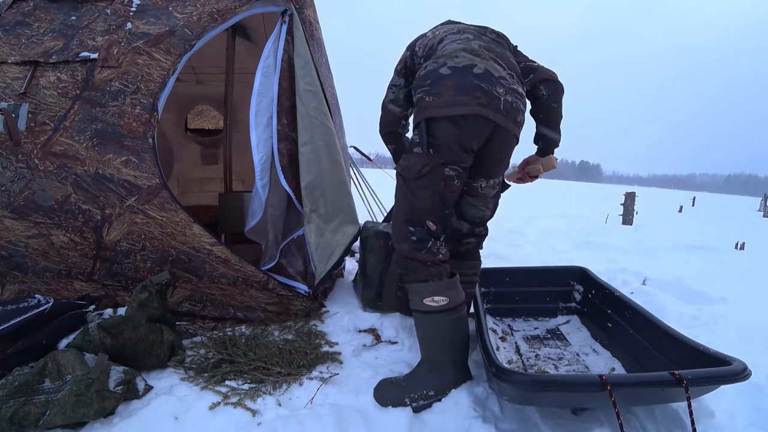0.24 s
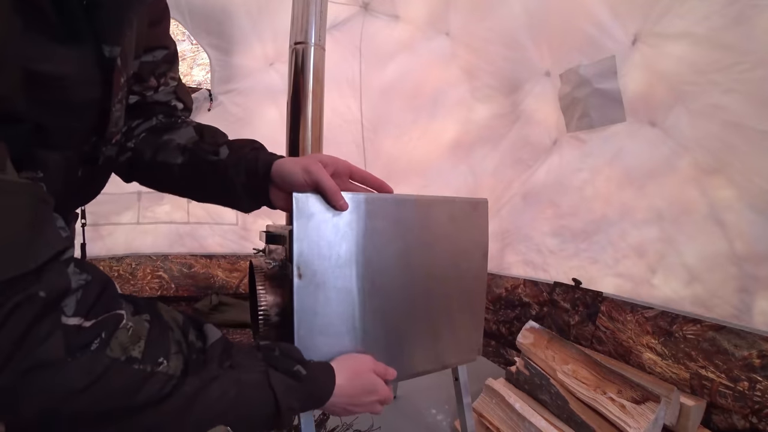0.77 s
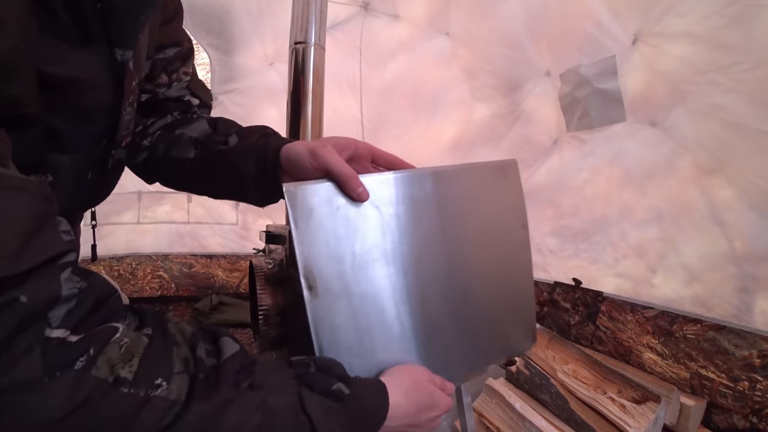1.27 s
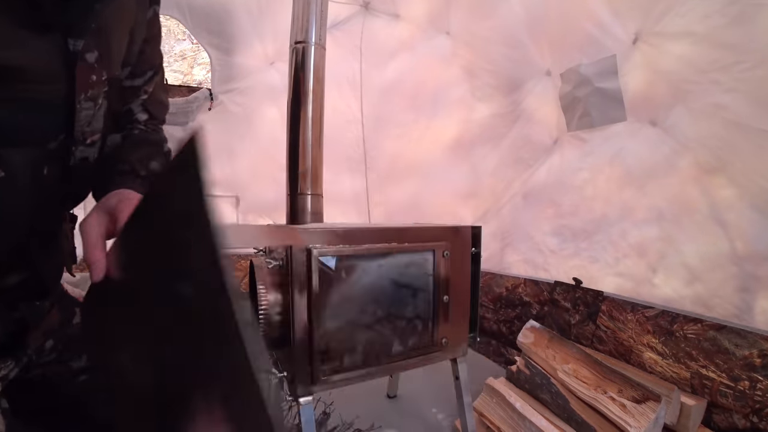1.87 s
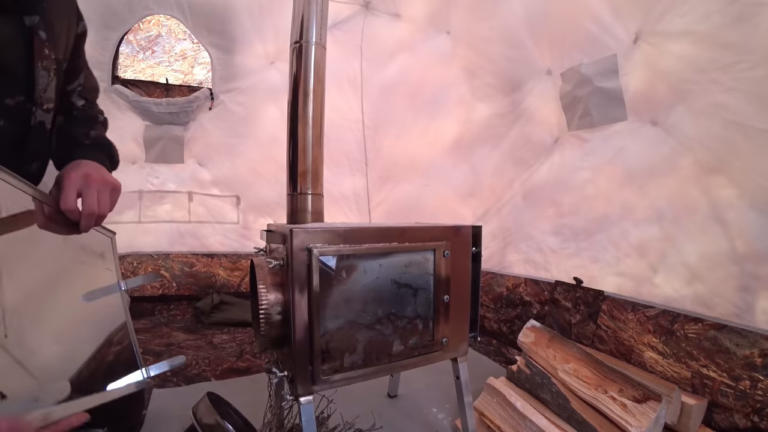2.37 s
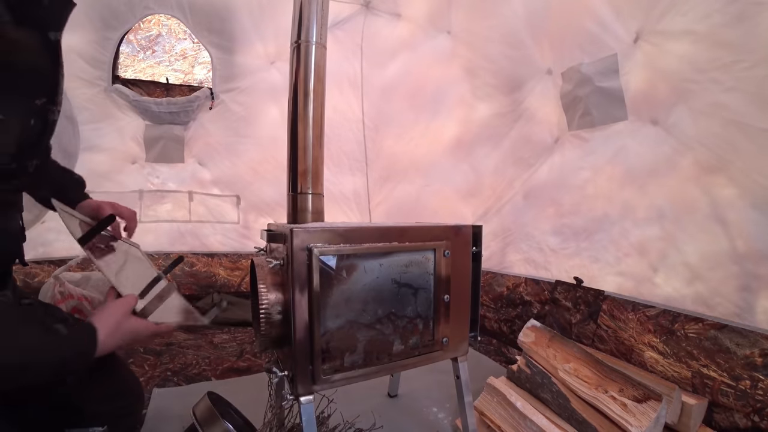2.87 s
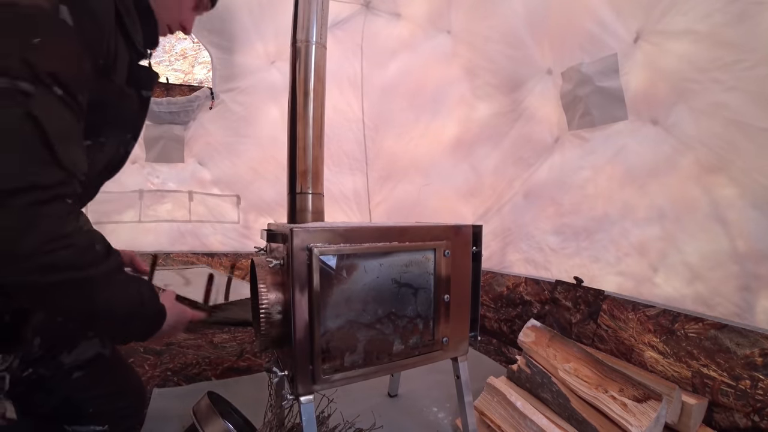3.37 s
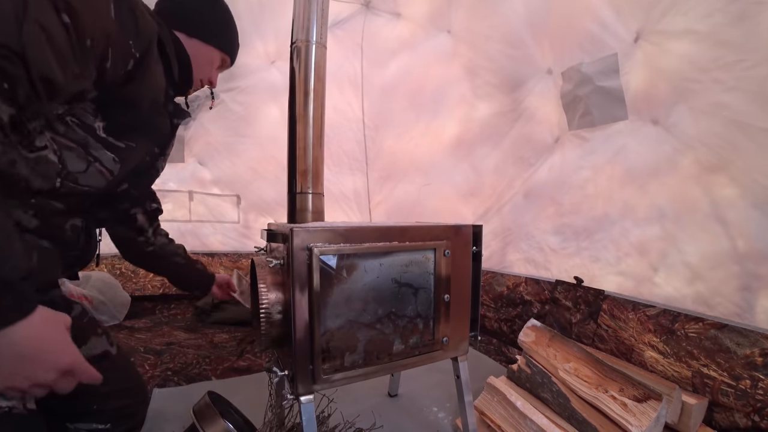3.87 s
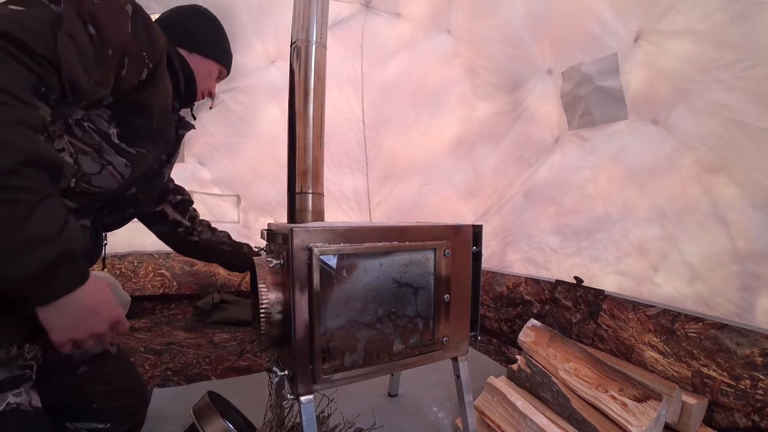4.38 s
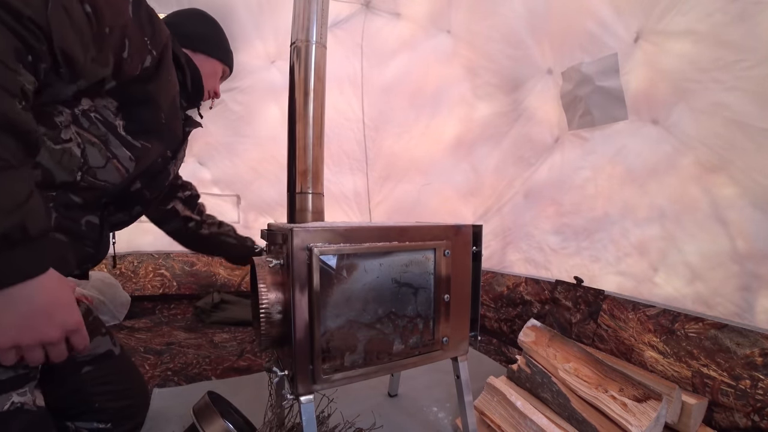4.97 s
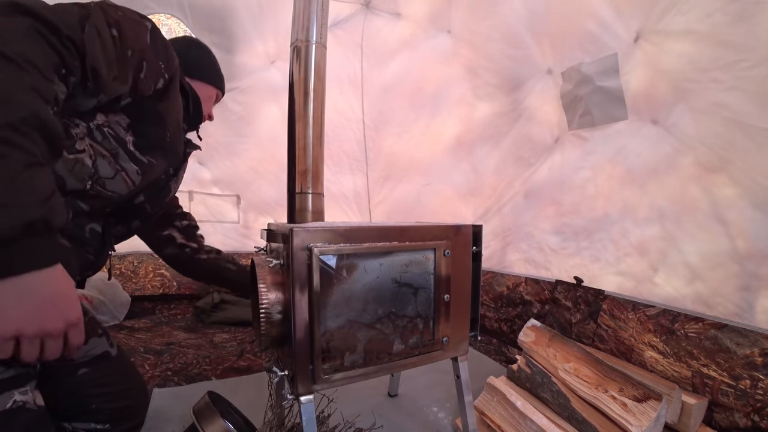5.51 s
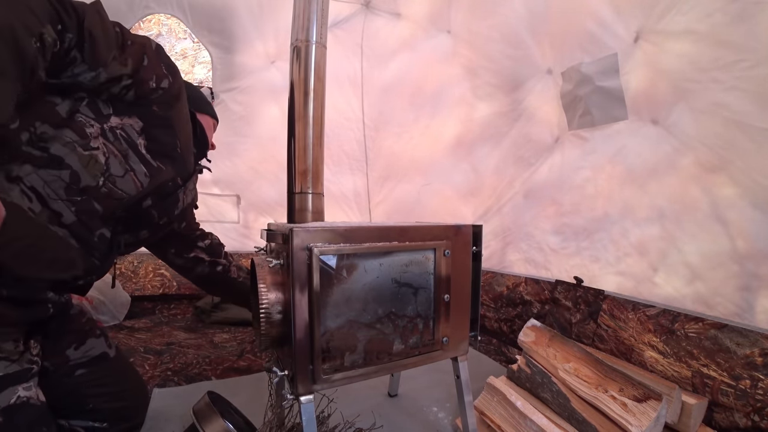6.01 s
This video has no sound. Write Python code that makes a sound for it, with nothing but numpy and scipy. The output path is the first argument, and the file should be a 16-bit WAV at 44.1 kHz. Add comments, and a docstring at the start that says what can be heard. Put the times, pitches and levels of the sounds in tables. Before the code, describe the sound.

From 0 to 0.58 s, outdoors and dry: low wind buffets the microphone, snow crunches, stiff clothes rustle, with a crisp snap near 0.18. A hard cut leads into a quiet tent with faint hush and jacket swishes. Around 0.9 steel scrapes lightly; a bright ringing clank comes at 1.08, a cluster of gritty rubs and short knocks at 1.15-1.24, and the loudest clang at 1.36, with a low sheet wobble fading after. Soft floor thuds accompany it from 0.9 to 1.4. At 2.1-2.3 thin clips scrape and clink quietly; fainter scrapes and muffled steps follow until 3.8. Light latch scratching comes at 4.0, sliding at 4.25, then a short rising hinge groan into a hard door bang at 4.6, with rattle and scrape to 4.75. A latch clacks at 5.16. Quiet cloth, then a dull metallic bump at 6.07 and a tiny one at 6.24.

```python
"""A steel heat shield is scraped and knocked off a small wood stove in a winter tent: clear modes over a crowd of
close ones, set off by cracks or tiny slips, then soft steps as it is carried away. The stove door is slid, shut on
a groaning hinge and latched, then bumped low down; the tent blurs the steel with a short, dense tail.
Behind it, jacket swishes and a faint hush. First comes a dry moment outdoors: wind on the microphone, rustling
clothes and snow, all shaped noise."""
import sys
import numpy as np
from scipy import signal
from scipy.fft import rfft, irfft, next_fast_len
from scipy.io import wavfile
from scipy.ndimage import uniform_filter1d

SR = 44100
rng = np.random.default_rng(int(sys.argv[2]) if len(sys.argv) > 2 else 0)


def to_wav(sig):
    """Store sig (one row per channel, or 1-D mono) as 16-bit WAV at the path in sys.argv[1].

    Samples outside -1..1 are clipped; the rate is SR.
    """
    pcm = np.clip(np.atleast_2d(sig), -1, 1) * 32767
    pcm = np.round(pcm).astype(np.int16)
    wavfile.write(sys.argv[1], SR, pcm.T)  # frames by channels


N = 275625
TIME = np.arange(N) / SR
RING_TIME = TIME[:SR // 2]
FIRM_DB = -30  # level of a firm touch

# shield modes: [f/Hz, t60/s, level/dB touched at hook, at rim, at corner]
SHIELD_MODES = [(622, 0.52, 0.5, -23, -29), (955, 0.15, 2.5, 12, -22), (1068, 0.18, -3, -13, 0),
                (1355, 0.2, 7.5, -12, -44), (1650, 0.11, -15, -26, -1), (1780, 0.19, -27, 4, -25),
                (1815, 0.11, -31.5, -20, 1), (2040, 0.078, -16, 5, 1.5), (2162, 0.33, 3, -5.5, -40),
                (2401, 0.13, 7.5, -4, -25), (2570, 0.094, 5, -14, -18), (2582, 0.16, -21, 7, -5.5),
                (2950, 0.06, -31, 12, -2), (3150, 0.12, -11, -10, -19), (3520, 0.14, 4, -17, -35),
                (3900, 0.088, 3.5, 8.5, -23), (4190, 0.13, 1, -9, -8), (4380, 0.19, -30, 6, -4.5),
                (4721, 0.24, -25, -15, -11), (5150, 0.22, -11, -16, -13), (5675, .22, -3.5, -14, -28),
                (6078, 0.24, -16, -9, -16), (6700, 0.22, -3, -7, -24), (7289, 0.26, -3.5, -13, -28)]
# stove modes: [f/Hz, t60/s, level/dB touched at door, at latch, at foot]
STOVE_MODES = [(289.3, 0.46, -19, -12, 2.5), (402.7, 0.35, 0.5, -6, 3.5), (472, .06, 6, -7, -27),
               (552, 0.049, 8.5, -27.5, -20), (616, 0.059, 11, -27, -12), (882, 0.1, -25, 12, -22),
               (947, 0.16, 1, -4, 7), (1610, 0.12, -1, -11.5, -8), (1883, 0.16, 2, -12, -1),
               (2050, 0.11, 3, 6, -13.5), (2240, 0.23, 1.5, -5, -11), (2520, 0.22, 4.5, -16, -3),
               (3400, 0.25, -2, -4, -12), (3840, 0.14, 1, -24.5, -19), (4830, 0.15, 3, 4, -14),
               (5670, 0.21, -4, 0, -14), (6160, 0.19, -2, 3.5, -20), (7580, 0.18, -0.5, -19, -26)]
# modes of the spring clips on the back of the shield: [f/Hz, t60/s, level/dB touched at root, at tip]
CLIP_MODES = [(968, 0.35, -4, -16), (1402, 0.17, -12, 5.5), (1537, 1.54, -30, -6.5), (2620, 0.15, -7, 4),
              (2870, 0.14, 0, 7), (3080, 0.17, 1.5, -9), (4520, 0.098, 1.5, -11), (4610, 0.18, 3, -16),
              (5500, .15, -9, -16), (8150, 0.087, -7, -3)]
# crowded upper modes of the clips: [f/Hz, level/dB]
CLIP_COLOUR = [(100, -19), (250, 1.5), (480, -16), (950, 0.5), (1180, -8), (1400, -6), (1700, -6.5),
               (2800, -4.5), (3850, -8), (4600, -3), (6500, -10.5), (8200, -18.5), (15500, -31)]
# touched places: modes (table), order (its level column), push_s (build-up time constant/s),
# pan_db (left minus right/dB), colour of the crowded modes [f/Hz, level/dB]
CONTACTS = { "hook": dict(modes=SHIELD_MODES, order=0, push_s=0.00056, pan_db=-.5, colour=[(59, -73),
            (100, -37), (429, -14), (627, -9), (791, -18), (1060, -12), (1230, -8), (1370, -3.5),
            (1840, -7), (2470, -1.5), (2810, -12), (4020, -4.5), (4450, -12), (5300, -8), (7410, -13.5),
            (15500, -23.5)]),
            "edge": dict(modes=SHIELD_MODES, order=1, push_s=0.00069, pan_db=-0.5, colour=[(59, -24),
            (150, -2), (500, -9), (760, -1.5), (1000, -2.5), (1500, -5.5), (2500, -7), (3500, -5.5),
            (6000, -10), (9000, -17.5), (15500, -30)]),
            "rim": dict(modes=SHIELD_MODES, order=1, push_s=0.00056, pan_db=0, colour=[(59, -23.5),
            (100, -17), (275, -11.5), (370, -7), (627, -12), (697, -3.5), (808, -11.5), (936, -1),
            (1290, -12.5), (1690, -8), (1840, -12), (2990, -6), (3610, -9.5), (6000, -11.5),
            (15500, -34.5)]),
            "corner": dict(modes=SHIELD_MODES, order=2, push_s=0.00045, pan_db=-.5, colour=[(60, -12),
            (115, 0), (250, -7), (500, 1), (800, 0.5), (1000, 4), (1270, -7.5), (1750, 2), (2400, -5),
            (4700, 0), (5600, -12), (6100, -2), (7200, -13), (8300, -7), (9700, -21.5), (11300, -7.5),
            (15500, -27)]),
            "clip": dict(modes=CLIP_MODES, order=0, push_s=0.0013, pan_db=3, colour=CLIP_COLOUR),
            "clip tip": dict(modes=CLIP_MODES, order=1, push_s=0.0045, pan_db=4, colour=CLIP_COLOUR),
            "door": dict(modes=STOVE_MODES, order=0, push_s=0.0016, pan_db=0.5, colour=[(80, -29),
            (180, -6), (280, -23), (400, 8), (620, -12.5), (730, -4), (1000, -4), (1750, -2), (2300, -4),
            (3200, -1), (6000, -1.5), (8500, -16.5), (11000, -16.5), (15500, -39)]),
            "latch": dict(modes=STOVE_MODES, order=1, push_s=0.003, pan_db=0.5, colour=[(59, -42),
            (100, -8), (293, -7.5), (370, -4), (403, -3.5), (682, -7.5), (879, -9.5), (977, -9),
            (1180, -6.5), (1800, -5), (2090, -3), (3460, -5), (3930, -3.5), (6530, -9), (15500, -28)]),
            "slider": dict(modes=STOVE_MODES, order=1, pan_db=1, colour=[(100, -11), (400, 0.5),
            (1100, -11.5), (1600, -6), (2100, 1.5), (3800, -0.5), (6300, -1.5), (9000, -13), (15500, -19)]),
            "foot": dict(modes=STOVE_MODES, order=2, push_s=0.0038, pan_db=0.5, colour=[(70, -21.5),
            (140, 8), (190, -9), (270, 13.5), (400, -2.5), (520, -22), (1000, -7), (1200, -7), (1800, -2.5),
            (4500, -6), (7000, -10.5), (9000, -20), (15500, -30)]), }
# answer to a firm touch: crack_db (knock crack/dB), rub_ring_db (clear ring of a rub/dB),
# tilt_db (rub tilt/(dB/octave)), judder_db (rub judder/dB per unit of walk)
RESPONSE = { "hook": dict(crack_db=-18),
            "edge": dict(crack_db=3, rub_ring_db=-24, tilt_db=-0.44, judder_db=0),
            "rim": dict(crack_db=1, rub_ring_db=-15, tilt_db=-0.5, judder_db=2.5),
            "corner": dict(crack_db=-7.5, rub_ring_db=-6, tilt_db=-1, judder_db=2),
            "clip": dict(crack_db=13, rub_ring_db=-7.5, tilt_db=4, judder_db=2),
            "clip tip": dict(crack_db=0),
            "door": dict(crack_db=-8, rub_ring_db=-6, tilt_db=-2, judder_db=2.5),
            "latch": dict(crack_db=3, rub_ring_db=-38, tilt_db=3, judder_db=0.8),
            "slider": dict(rub_ring_db=-28, tilt_db=2.5, judder_db=0), "foot": dict(crack_db=-4), }
# thud of the tent floor: [f/Hz, level/dB]
THUD = [(25, -4), (60, -1.5), (100, 4), (150, 3.5), (230, -3), (300, -5), (420, -4.5), (700, -12.5),
        (1900, -16.5), (4000, -45)]


def undb(db):
    """Decibels to gain."""
    return 10 ** (np.asarray(db) / 20)


def unit(x):
    """Scale to rms 1."""
    return x / np.sqrt(np.mean(x ** 2))


def gain_at(hz, points):
    """Gain of a [f/Hz, level/dB] table, interpolated on log frequency."""
    f, db = np.transpose(points)
    return undb(np.interp(np.log(hz + 1), np.log(f), db))


def shape(x, response):
    """Filter by a gain that is a function of frequency."""
    size = next_fast_len(x.shape[-1])
    gain = response(np.arange(size // 2 + 1) * SR / size)
    return irfft(rfft(x, size) * gain, size)[..., :x.shape[-1]]


def noise(colour, size=N, grain_db=0):
    """Coloured stereo noise with mid rms 1; uneven sample sizes make it gritty."""
    # stereo width: [f/Hz, side minus mid/dB]
    side_db = [(25, -17), (70, -11), (130, -16), (300, -19), (600, -17), (2000, -12), (8000, -6.5),
               (15000, -8)]
    grit = undb(grain_db * np.repeat(rng.standard_normal(size // 32 + 1), 32)[:size])
    mid, side = shape(grit * rng.standard_normal((2, size)), lambda f: gain_at(f, colour))
    side = shape(side, lambda f: gain_at(f, side_db))
    return np.array([mid + side, mid - side]) / np.std(mid)


def walk(rate_per_s, size=N):
    """Random drift between fresh values at the given rate; its spread is about 1.4."""
    hold = int(SR / rate_per_s)
    held = np.repeat(rng.standard_normal(size // hold + 1), hold)
    return 1.72 * uniform_filter1d(held, hold)[:size]


def fade(t60_s):
    """Exponential decay by 60 dB in t60_s."""
    return np.exp(-np.log(1000) * RING_TIME / t60_s)


def held_fade(t60_s, hold_s):
    """Level 1 for hold_s, then exponential decay."""
    return np.minimum(1, fade(t60_s) * np.exp(np.log(1000) * hold_s / t60_s))


def swell(s, rise_s, fall_s):
    """Gaussian-flanked movement that peaks at 1 at time s; the floor of exp(-20) is inaudible."""
    return np.exp(-np.minimum(((TIME - s) / np.where(TIME < s, rise_s, fall_s)) ** 2, 20))


def movements(rows, rest_db):
    """Gain of [t/s, half length/s, level/dB] movements over a resting level; their powers add."""
    power = sum((undb(db) * swell(s, half_s, half_s)) ** 2 for s, half_s, db in rows)
    return np.sqrt(undb(rest_db) ** 2 + power)


def add(out, s, x):
    """Mix a sound in at time s."""
    start = max(int(s * SR), 0)
    out[:, start:start + x.shape[1]] += x[:, :N - start]


def outdoors():
    """Wind buffets the ports; snow and stiff clothes crunch and snap, dry and without echo."""
    # wind and snow spectra: [f/Hz, level/dB]
    wind_colour = [(12, -2.5), (22, 5), (38, 1), (60, -5.5), (130, -13), (400, -40), (800, -67)]
    snow_colour = [(88, -27), (150, -0.5), (243, -3), (306, 0), (386, -3.5), (972, -4), (1640, -7.5),
                   (4720, -12), (11200, -27), (15000, -31.5)]
    # wind gusts: [t/s, half length/s, level/dB]
    gusts = [(.06, 0.022, -41), (.15, 0.048, -36), (.297, 0.023, -39.5), (.442, 0.013, -33.5),
             (.56, .015, -45)]
    # boots shifting weight in snow: [t/s, half length/s, level/dB]
    crunches = [(.07, 0.025, -42.5), (.108, 0.039, -42.5), (.22, 0.076, -47.5), (.516, 0.0089, -40),
                (.558, 0.034, -40.5)]
    # snaps of stiff cloth and snow crust: [t/s, level/dB, centre f/Hz, t60/s]
    snaps = [(0.097, -41, 1500, 0.028), (0.1818, -27.5, 4800, 0.016), (.262, -44, 9000, .025),
             (.350, -41, 10000, 0.018), (0.362, -39, 4900, 0.022), (0.469, -37, 3400, 0.043),
             (0.495, -43, 10500, 0.014), (0.507, -43, 2600, .025), (0.555, -42, 1500, 0.013)]
    wind_db, rustle_db = -44, -47.5  # resting levels; the rustle is stiff clothes
    wind = noise(wind_colour) * movements(gusts, wind_db) * undb(1.4 * walk(17.6))
    snow = noise(snow_colour, grain_db=1.5) * movements(crunches, rustle_db) * undb(1.54 * walk(60.3))
    out = wind + snow
    for s, db, hz, t60_s in snaps:
        colour = [(hz / 4, -25), (hz * 0.64, -10), (hz, 0), (hz * 1.6, -14), (hz * 3, -22)]
        snap = noise(colour, len(RING_TIME)) * fade(t60_s)
        add(out, s, undb(db) * snap * (1 - np.exp(-RING_TIME / 0.00094)))
    return out


def tent():
    """Sleeves brush unevenly with each arm movement, over a faint steady hush."""
    # jacket cloth and tent hush spectra: [f/Hz, level/dB]
    cloth_colour = [(40, -8.5), (110, -6), (250, -8), (700, -11), (1600, -12), (4400, -11), (8000, -19.5),
                    (15500, -31)]
    hush_colour = [(20, -1), (60, -6), (200, -20.5), (600, -16), (1800, -13), (3000, -29), (15500, -28.5)]
    # arm movements: [t/s, half length/s, level/dB]
    swishes = [(.66, 0.12, -51.5), (.84, 0.15, -54.5), (1.87, 0.14, -55.5), (2.13, 0.21, -49),
               (2.66, 0.27, -53), (3.2, 0.33, -57.5), (3.5, 0.23, -56.5), (4.15, 0.58, -57),
               (4.84, 0.1, -54), (5.22, 0.23, -57.5), (6.05, 0.28, -56)]
    jacket_db, hush_db = -61.5, -64.5  # jacket between movements; hush
    cloth = noise(cloth_colour, grain_db=0.5)
    sleeves = cloth * movements(swishes, jacket_db) * undb(0.69 * walk(30))
    return sleeves + noise(hush_colour) * undb(hush_db)


def steps():
    """Soft boots and knees load the floor in dull noise thuds; boots also drag over it."""
    # footfalls and knees: [t/s, level/dB]
    footfalls = [(0.929, -42), (1.002, -37), (1.142, -31), (1.268, -32.5), (1.404, -36), (1.862, -50.5),
                 (2.223, -43.5), (2.297, -44.5), (2.771, -40), (2.805, -45), (3.273, -50), (3.438, -47.5),
                 (3.481, -43), (3.616, -45.5), (3.675, -49.5), (3.795, -51), (4.414, -51.5), (4.965, -57)]
    # dragged boots: [t/s, half length/s, level/dB]
    shuffles = [(0.696, 0.035, -47.5), (0.814, 0.18, -54), (1.602, 0.017, -41), (1.663, 0.043, -45.5)]
    build_s, hold_s, t60_s = 0.0039, 0.0017, 0.16
    drag = sum(undb(db) * swell(s, half_s, half_s) for s, half_s, db in shuffles)
    out = noise(THUD) * drag
    load = np.minimum(RING_TIME / build_s, 1) * held_fade(t60_s, hold_s)
    for s, db in footfalls:
        add(out, s - build_s / 2, undb(db) * noise(THUD, len(RING_TIME)) * load)
    return out


def wobble():
    """Lowest bending mode of the sheet, as narrow-band noise: each flex sets it swaying, it dies slowly."""
    # flexes as the sheet comes free and as it is turned over: [t/s, level/dB]
    flexes = [(1.24, -45), (2.2, -75)]
    centre_hz, half_width_hz = 136, 11.6
    rise_s, t60_s = 0.0193, 2.2
    sway = shape(rng.standard_normal(N), lambda f: 1 / (1 + ((f - centre_hz) / half_width_hz) ** 2))
    power = 0
    for s, db in flexes:
        age_s = np.maximum(TIME - s, 0)
        level = undb(db) * np.minimum(age_s / rise_s, 1) * np.exp(-np.log(1000) * age_s / t60_s)
        power = power + level ** 2
    return unit(sway) * np.sqrt(power)


def hinge():
    """The groan gets higher and louder as the door gathers speed; its pitch and level are unsteady."""
    slow_hz, fast_hz, groan_db = 359, 461, -52  # before the random wander
    speed = swell(4.552, rise_s=0.0686, fall_s=0.063)  # fastest shortly before the door strikes
    hz = (slow_hz + (fast_hz - slow_hz) * speed ** 2) * (1 + 0.047 * walk(200))
    groan = unit(np.sin(2 * np.pi * np.cumsum(hz) / SR))
    return groan * speed * undb(groan_db + 3.1 * walk(100))


def modal_ring(place):
    """Clear modes of the touched part; a weaker detuned twin makes each beat."""
    mode_split = 0.00703  # nominal detuning of the twin as a share of f
    clear, gains = 0, undb(np.array([mode[2 + place["order"]] for mode in place["modes"]]))
    for (hz, mode_t60_s, *_), gain in zip(place["modes"], gains):
        # short waves reach the two ports less alike
        port_scatter = 0.5 * min(hz / 4000, 1) * rng.standard_normal((2, 1))
        phase = rng.uniform(0, 2 * np.pi) + port_scatter
        twin_hz = hz * (1 + mode_split * rng.choice([-1, 1]) * rng.uniform(1 / 2, 2.3))
        angle, twin_angle = (np.float32(2 * np.pi * f * RING_TIME) + np.float32(phase) for f in (hz, twin_hz))
        pair = np.sin(angle) + 0.55 * np.cos(twin_angle)
        clear = clear + gain * fade(mode_t60_s) * pair
    return clear / np.sqrt(np.sum(gains ** 2) / 2)


def crowded_wash(place, t60_s):
    """Crowd of close modes as unevenly bunched noise, decaying by octave and blurred by the tent."""
    ripple_db, ripple_step_hz = 3.5, 54.95  # spread and spacing of the bunches
    tent_fill_s = 0.0054  # early reflections hold the level
    bass_linger = 0.0047  # lows outlast the treble: log2 of t60 per octave down
    crowd, wash = noise(place["colour"], len(RING_TIME), grain_db=0.5), 0
    bunches = unit(undb(ripple_db * rng.standard_normal(600)))
    crowd = shape(crowd, lambda f: np.interp(f, ripple_step_hz * np.arange(len(bunches)), bunches))
    octaves = np.arange(-3, 5)  # relative to 1 kHz
    for octave in octaves:
        band = shape(crowd, lambda f: np.interp(np.log2((f + 1) / 1000), octaves, octaves == octave))
        wash = wash + band * held_fade(t60_s * 2 ** (-bass_linger * octave), tent_fill_s)
    return wash


def ring(contact, ring_db, t60_s):
    """Steel touched once: clear modes over a wash of crowded ones, panned to its place."""
    place = CONTACTS[contact]
    steel = crowded_wash(place, t60_s) + undb(ring_db) * modal_ring(place)
    pan = undb(place["pan_db"] / 2 * np.array([[1], [-1]]))
    return steel * (1 - np.exp(-RING_TIME / 0.00045)) * pan


def scrapes():
    """Tiny slips keep steel ringing; grip judders, the spot wanders between two, firmer rubs are brighter."""
    # rubs of metal on metal: [t of strongest pressure/s, contact, rise/s, fall/s, level/dB]
    rubs = [(.929, "edge", 0.027, 0.044, -32), (1.005, "edge", 0.032, 0.062, -37.5),
            (1.148, "rim", 0.018, 0.051, -26.5), (1.183, "rim", 0.017, 0.038, -25),
            (1.349, "corner", 0.02, 0.013, -30.5), (2.23, "clip", 0.055, 0.066, -39),
            (2.52, "clip", 0.0152, 0.041, -48.5), (2.69, "clip", 0.026, 0.018, -47),
            (2.765, "clip", 0.026, 0.033, -48.5), (4.034, "latch", 0.034, 0.023, -38),
            (4.243, "slider", 0.011, 0.12, -43.5), (4.46, "slider", 0.09, 0.073, -46.5),
            (4.581, "latch", 0.19, 0.11, -42.5), (4.724, "door", 0.024, 0.018, -29),
            (4.8, "latch", 0.083, 0.028, -48.5)]
    slips_per_s, slip_scatter_db = 1400, 1.5
    judder_per_s, wander_per_s = 130, 30  # rates of grip and of spot
    tilt_growth = 0.19  # dB/octave per dB above a firm touch
    out = np.zeros((2, N))
    for s, contact, rise_s, fall_s, db in rubs:
        part, t = RESPONSE[contact], TIME[:SR] - 1 / 2
        judder = unit(undb(part["judder_db"] * walk(judder_per_s, SR)))
        pressure = np.exp(-(t / np.where(t < 0, rise_s, fall_s)) ** 2) * judder
        sizes = rng.choice([-1, 1], SR) * undb(slip_scatter_db * rng.standard_normal(SR))
        slips = unit((rng.random(SR) < slips_per_s / SR) * sizes)
        tilt_db = part["tilt_db"] + tilt_growth * (db - FIRM_DB)
        slips = shape(slips * pressure, lambda f: undb(tilt_db * np.log2((f + 100) / 2500)))
        spot = walk(wander_per_s, SR)
        for share in np.cos(spot), np.sin(spot):
            body = ring(contact, part["rub_ring_db"], 0.18)
            body = body / np.sqrt(np.sum(body ** 2) / 2)
            rub = signal.fftconvolve((share * slips)[None], body, axes=1)
            add(out, s - 1 / 2, undb(db) * rub)
    return out


def knocks():
    """Each knock is a noise crack plus the ring of the part hit; harder knocks crack more."""
    # knocks: [t/s, contact, level/dB, clear ring/dB, wash t60/s]
    hits = [(.912, "edge", -35.5, -16, 0.21), (1.0782, "hook", -17, 1.5, 0.37),
            (1.147, "rim", -28.5, -9, 0.08), (1.17, "rim", -31.5, -7, .05),
            (1.1936, "rim", -23.5, 1, 0.046), (1.2286, "rim", -22, 0.5, 0.19),
            (1.235, "rim", -32, 6, 0.044), (1.356, "corner", -15, 0, 0.18),
            (2.131, "clip tip", -43, -6, 0.29), (2.188, "clip tip", -43, 4.5, .16),
            (2.243, "clip", -36, -3.5, 0.2), (2.285, "clip", -43, 5.5, 0.25),
            (2.907, "clip tip", -47, -0.5, 0.12), (3.981, "latch", -46, -7, 0.5),
            (4.441, "latch", -41, -13, 0.051), (4.6023, "door", -17, 2, 0.27),
            (4.618, "latch", -20.5, -8, .15), (4.671, "door", -31.5, 4.5, 0.11),
            (5.157, "latch", -25.5, -2, 0.21), (6.067, "foot", -29.5, -11.5, 0.17),
            (6.236, "foot", -45, 3.5, .2)]
    crack_growth = 0.56  # dB of crack per dB above a firm touch
    crack_colour = [(300, -30), (700, -17), (1500, 4), (6000, 5), (15000, -4)]  # f/Hz, level/dB
    out = np.zeros((2, N))
    for s, contact, db, ring_db, t60_s in hits:
        crack = noise(crack_colour, len(RING_TIME), grain_db=-0.5) * fade(0.021)
        crack_db = RESPONSE[contact]["crack_db"] + crack_growth * (db - FIRM_DB)
        push = 1 - np.exp(-RING_TIME / CONTACTS[contact]["push_s"])
        knock = ring(contact, ring_db, t60_s) + undb(crack_db) * crack
        add(out, s, undb(db) * push * knock)
    return out


def scene():
    """A moment outdoors, then the work at the stove."""
    inside_s = 0.578
    inside = knocks() + scrapes() + hinge() + steps() + wobble() + tent()
    return np.where(TIME < inside_s, outdoors(), inside)


def record(dry):
    """The two ports differ a little in colour and phase; the top is cut."""
    # port balance: [f/Hz, left minus right/dB]
    balance_db = [(60, .7), (300, -1.8), (700, -1.8), (2000, -.3), (5000, .7)]
    # port phase: [f/Hz, left lead/rad]
    port_phase = [(60, -.1), (130, -.35), (250, -.55), (600, -.65), (1000, -.5), (2500, -.1)]
    top_hz = 15800

    def half_difference(f):
        """Half of the port difference; the other port gets its inverse."""
        hz, radians = np.transpose(port_phase)
        return np.sqrt(gain_at(f, balance_db) * np.exp(1j * np.interp(f, hz, radians)))

    ports = [shape(dry[0], half_difference), shape(dry[1], lambda f: 1 / half_difference(f))]
    return signal.sosfilt(signal.ellip(10, .2, 80, top_hz, fs=SR, output="sos"), ports)


dry = scene()
out = record(dry)
to_wav(out)
```